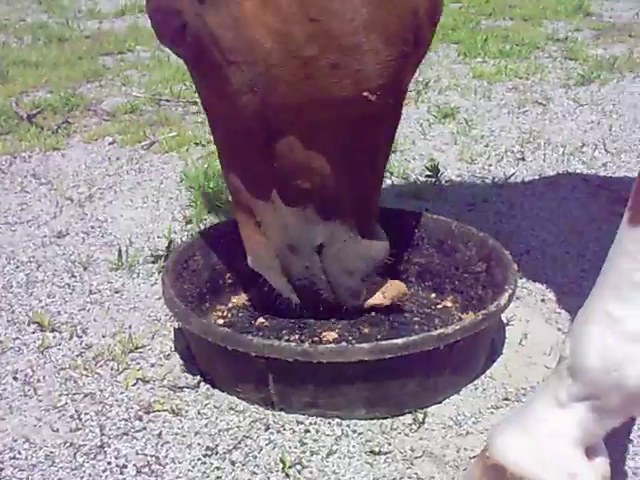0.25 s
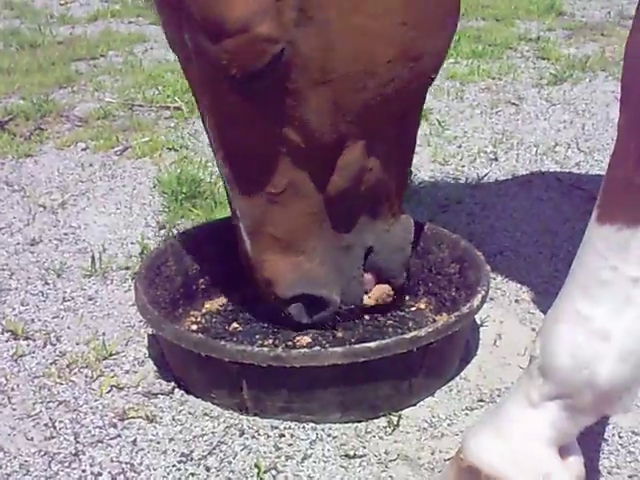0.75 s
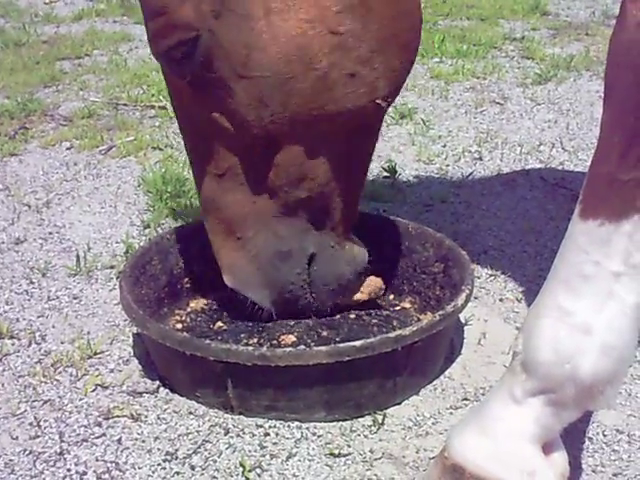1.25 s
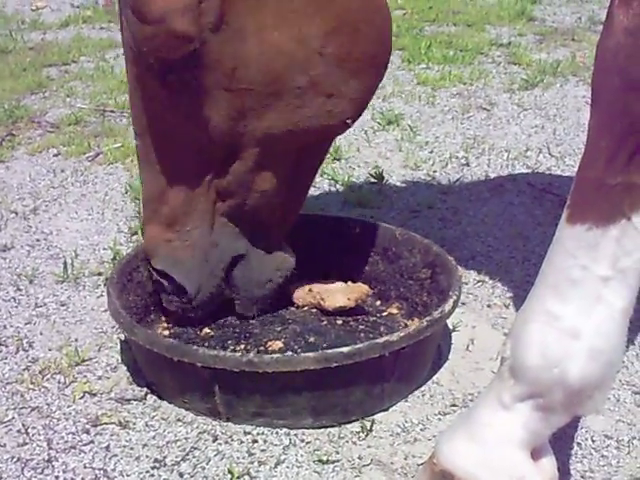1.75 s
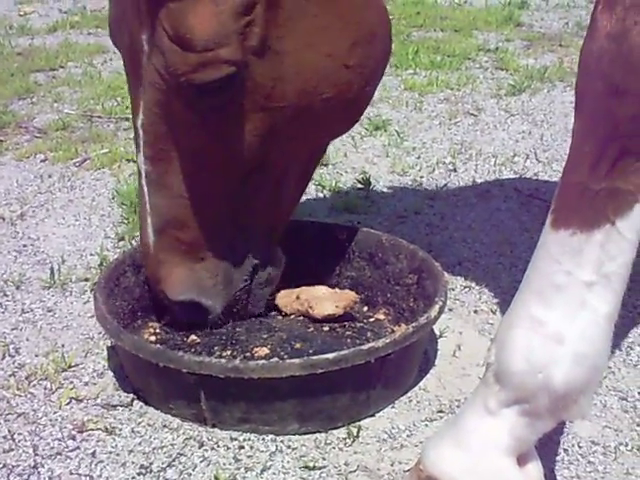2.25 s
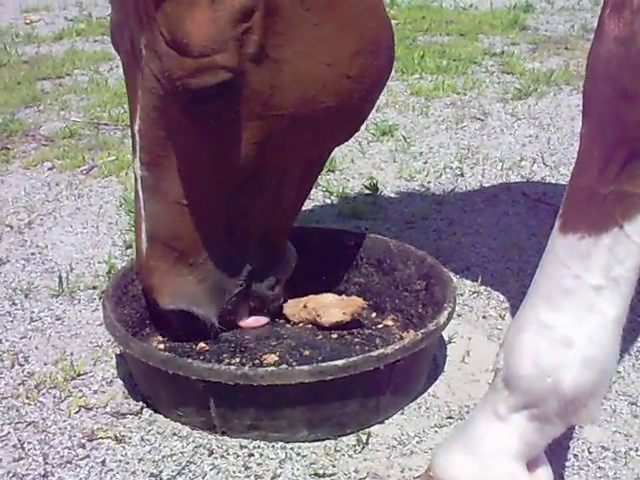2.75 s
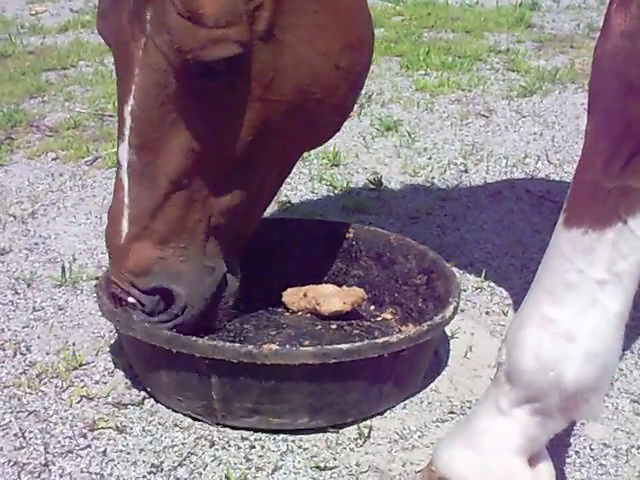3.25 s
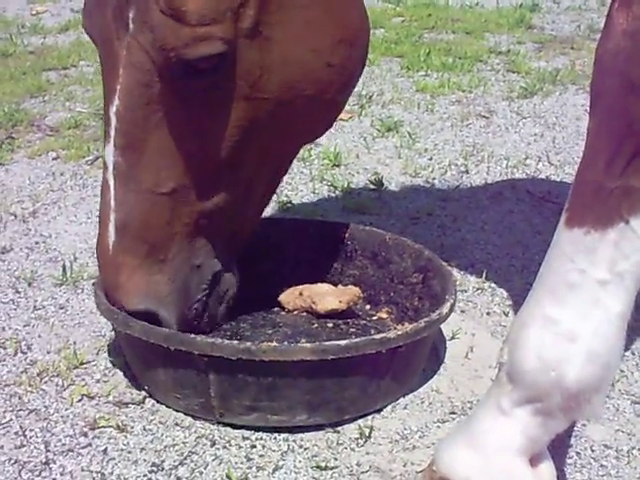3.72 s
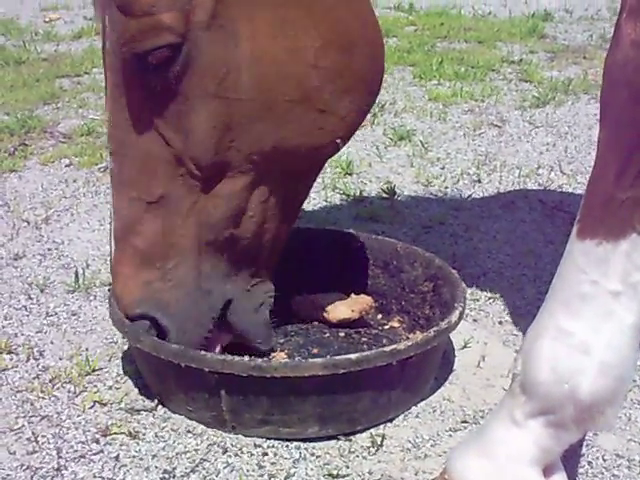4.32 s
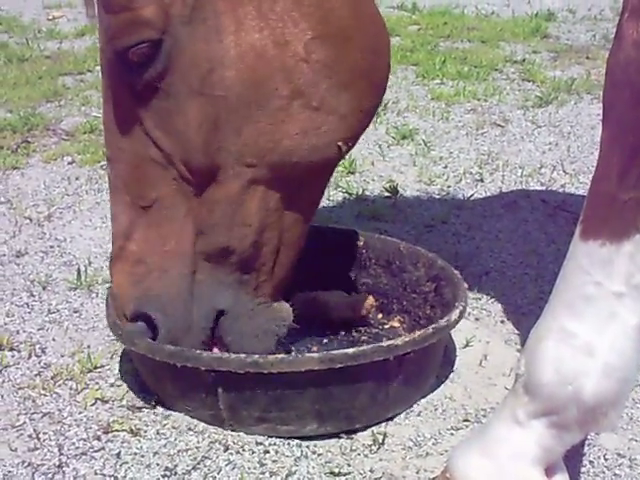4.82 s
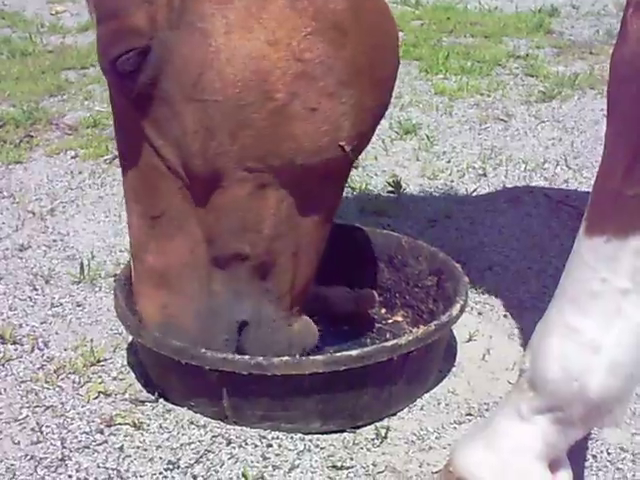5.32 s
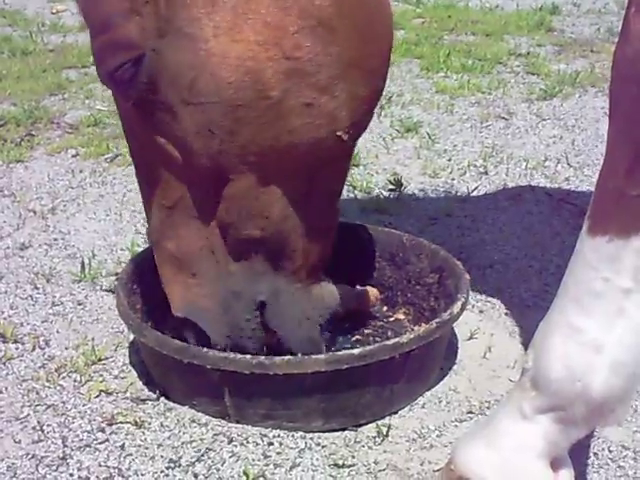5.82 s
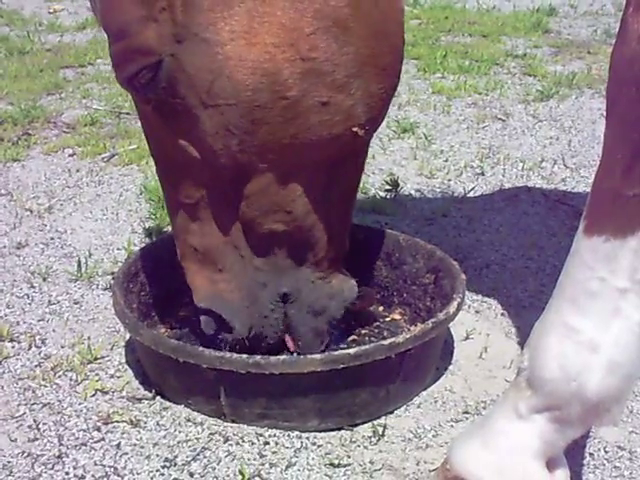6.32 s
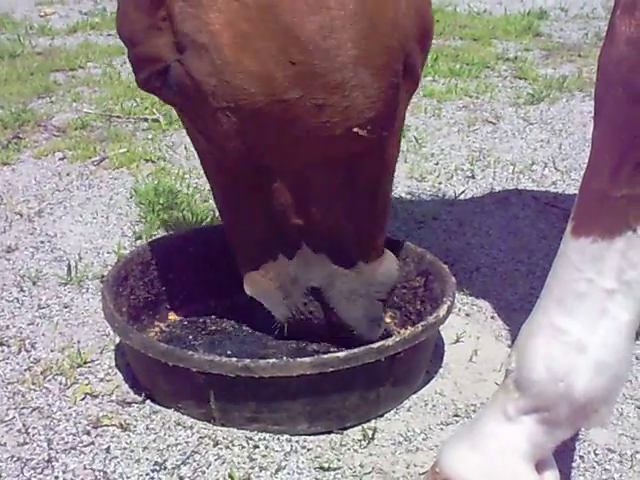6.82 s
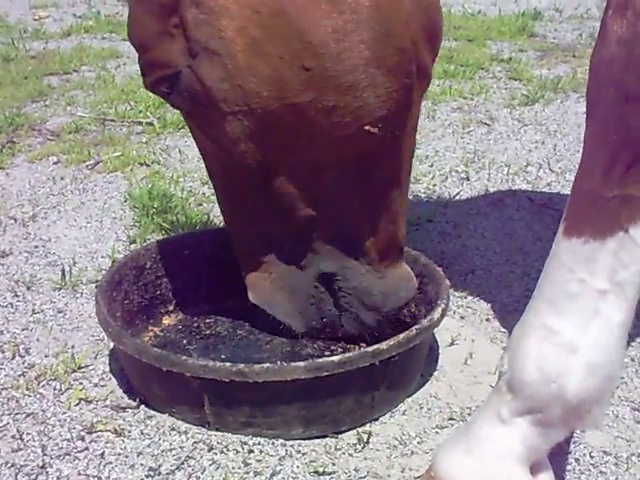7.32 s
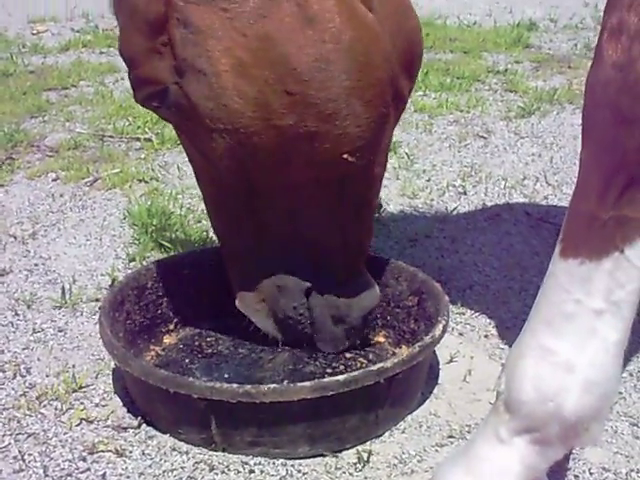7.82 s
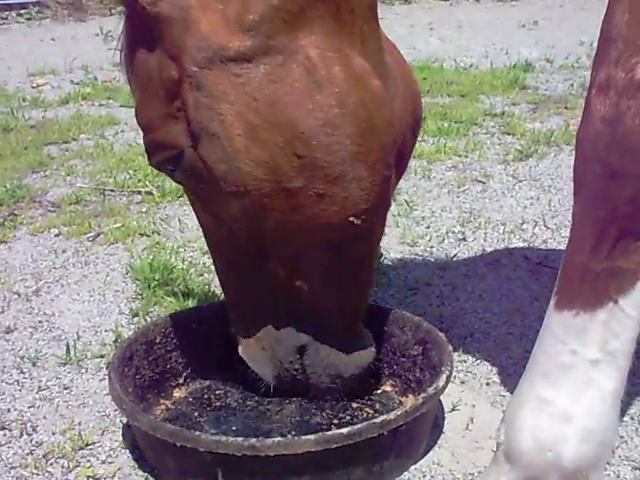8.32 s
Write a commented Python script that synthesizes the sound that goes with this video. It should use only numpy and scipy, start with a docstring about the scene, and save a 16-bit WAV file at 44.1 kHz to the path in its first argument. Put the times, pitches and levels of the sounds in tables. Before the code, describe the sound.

A horse licks and nibbles icy mash from a pan up close, with wet smacks, soft bumps and crumbly rustling over a quiet outdoor rush.

```python
"""First an even outdoor rush with a far motor hum and light wind rumble; then a muzzle bumps a feed pan.
Close to the microphone a horse licks and nibbles frozen mash out of the pan on gravel. Random slips ring
the pockets of the mouth as wet lips and tongue smack and lick; decaying sine modes make the bumps.
Dense grains of noise make the rustle of icy crumbs, and a wavering sine makes a faint, sagging whistle."""
import sys
import numpy as np
from scipy import signal
from scipy.fft import rfft, irfft
from scipy.io import wavfile

SR = 44100
rng = np.random.default_rng(int(sys.argv[2]) if len(sys.argv) > 2 else 0)


def master_out(mix):
    """Clip the mix to full scale and print it as 16-bit PCM to the path in sys.argv[1]."""
    frames = np.transpose(np.atleast_2d(mix))
    ceiling = np.clip(frames, -1, 1)
    pcm = np.round(ceiling * 32767).astype(np.int16)
    wavfile.write(sys.argv[1], SR, pcm)


N = 377315  # length in samples


def from_db(db):
    """Decibels to amplitude gain."""
    return 10 ** (np.asarray(db) / 20)


def rms_one(x):
    """Scale to unit power."""
    return x / np.sqrt(np.mean(x ** 2) + 1e-20)


def in_time(rows):
    """Interpolate each column of a curve over its times, sample by sample."""
    times, *columns = np.transpose(rows)
    return [np.interp(np.arange(N) / SR, times, column) for column in columns]


def drift(rate):
    """Random wandering with rms 1, drawn through rate random knots a second."""
    knots = rng.standard_normal(N // 40)
    return rms_one(np.interp(np.arange(N) / SR * rate, np.arange(len(knots)), knots))


def colour(x, spectrum):
    """Shape a steady sound by a spectrum, interpolated over log frequency; rms 1."""
    hz, db = np.transpose(spectrum)
    bins = np.maximum(np.arange(N // 2 + 1) * SR / N, 1)
    gain = from_db(np.interp(np.log(bins), np.log(hz), db))
    return rms_one(irfft(rfft(x) * gain, N))


def resonate(x, hz, width_hz):
    """A damped cavity, as a two-pole resonator with gain about 1 at its centre."""
    r = np.exp(-np.pi * width_hz / SR)
    numerator = [(1 - r * r) / 2, 0, (r * r - 1) / 2]
    denominator = [1, -2 * r * np.cos(2 * np.pi * hz / SR), r * r]
    return signal.lfilter(numerator, denominator, x + 1e-18)


def add(track, s, sound):
    """Lay a sound into the track at s seconds."""
    at = round(s * SR)
    track[at:at + len(sound)] += sound[:N - at]


def grains(per_s, spread_db, smooth):
    """Tiny ruptures of uneven size over a share of smooth friction; rms 1."""
    sizes = from_db(spread_db * np.minimum(rng.exponential(1, N), 4))
    clicks = (rng.random(N) < per_s / SR) * sizes * rng.choice([-1, 1], N)
    return rms_one(rms_one(clicks) + smooth * rng.standard_normal(N))


def pocket(peel_s, hz, width_hz, skirt_hz, rasp):
    """A wet film snaps, then tears on in slips paced by peel_s, ringing an air pocket; unit power over 10 ms."""
    t = np.arange(SR // 12) / SR
    slips = rng.standard_normal(len(t)) ** 3
    tear = slips * (t / peel_s) * np.exp(-(t / peel_s) ** 2)
    # the slower the peel, the more the tearing outweighs the first snap
    push = rasp * np.sqrt(peel_s * 1000) * tear / np.linalg.norm(tear)
    push[0] += 1
    ring = resonate(resonate(push, hz, width_hz), hz, skirt_hz)
    return ring / np.sqrt(np.sum(ring ** 2) / (SR / 100))


def swell(s, swell_s):
    """A rounded rise to 1 at s seconds, then a quicker release."""
    release_share, roundness = 0.64, 1.2  # release time as a share of the rise; exponent
    u = (np.arange(N) / SR - s) / swell_s
    near = np.abs(u) < 6
    out = np.zeros(N)
    out[near] = np.exp(-np.maximum(-u[near], u[near] / release_share) ** roundness)
    return out


def strokes(rows, rest_db):
    """Gain of a run of strokes (s, swell s, dB), summed in power over a light, steady contact."""
    power = sum((from_db(db) * swell(s, swell_s)) ** 2 for s, swell_s, db in rows)
    return np.sqrt(from_db(rest_db) ** 2 + power)


# Far motor and wind rumble over time: t/s, mean motor level/dB, rumble level/dB
BACKGROUND_LEVELS = [(0, -55.5, -51), (.3, -52, -53), (.6, -50, -53), (1.1, -51, -49.5), (1.7, -51.5, -58),
                     (2.0, -61, -54), (3, -69, -55.5), (4, -68, -61), (4.4, -60, -60), (5, -79, -56),
                     (6, -61, -68), (6.5, -55, -53.5), (7.1, -57.5, -57), (7.6, -57.5, -50.5),
                     (8.5, -61, -53.5)]
# Spectrum of the wind rumble: f/Hz, relative level/dB per Hz
RUMBLE_SPECTRUM = [(10, -5), (25, -1.5), (48, -1), (90, -8), (200, -18), (600, -44.5), (4000, -82)]
# Spectrum of the even outdoor rush: f/Hz, relative level/dB per Hz
AIR_SPECTRUM = [(15, -17.5), (30, -12.5), (60, -7.5), (120, -8), (220, -11), (340, -14.5), (480, -19),
                (750, -21.5), (1100, -21.5), (1700, -25), (2600, -26), (7400, -30.5), (9000, -37)]


def outdoors():
    """Shaped noise for the even rush and light wind rumble, a wavering sine for the far motor."""
    motor_hz, air_db = 83.9, -48.5
    motor_db, rumble_db = in_time(BACKGROUND_LEVELS)
    phase = 2 * np.pi * np.cumsum(motor_hz + 1.83 * drift(10)) / SR
    motor = np.sqrt(2) * from_db(motor_db + 1.3 * drift(11)) * np.sin(phase)
    rumble = from_db(rumble_db) * colour(rng.standard_normal(N), RUMBLE_SPECTRUM)
    air = from_db(air_db) * colour(rng.standard_normal(N), AIR_SPECTRUM)
    return motor + rumble + air


def whistle():
    """A thin, faint, unsteady sine fades in, holds and fades out while it sags in pitch."""
    start_s, end_s, attack_s, release_s = 0.79, 1.63, 0.29, 0.22
    level_db, start_hz, sag_hz_per_s = -60.5, 5500, 170
    t = np.arange(N) / SR
    hz = start_hz - sag_hz_per_s * (t - start_s)
    fade = np.clip(np.minimum((t - start_s) / attack_s, (end_s - t) / release_s), 0, 1)
    gain = fade * from_db(level_db + 2.8 * drift(40))
    return np.sqrt(2) * gain * np.sin(2 * np.pi * np.cumsum(hz + 18 * drift(120)) / SR)


def faint_smacks():
    """Small films of spit burst at random moments and pitches."""
    per_s, lip_db, spit_db = 4, -58.5, -54  # levels before the random size of 0.5 to 1.5
    out = np.zeros(N)
    for when, lip, spit, size in rng.random((int(per_s * N / SR), 4)):
        lip_ring = pocket(0.0026, 1400 + 1400 * lip, width_hz=200, skirt_hz=800, rasp=0.9)
        spit_ring = pocket(0.002, 3500 + 3500 * spit, width_hz=650, skirt_hz=2000, rasp=1.2)
        both = from_db(lip_db) * lip_ring + from_db(spit_db) * spit_ring
        add(out, when * (N - 1) / SR, (.5 + size) * both)
    return out


# The muzzle sweeps over icy crumbs: t/s at the fastest point, swell t/s, level/dB
SWEEPS = [(0.21, 0.05, -52), (0.34, 0.016, -54), (0.585, 0.028, -47), (0.9, 0.1, -53), (1.16, 0.12, -51),
          (1.39, 0.073, -50.5), (1.515, 0.015, -47), (1.64, 0.068, -49.5), (1.962, 0.057, -40),
          (2.305, 0.05, -40.5), (2.44, 0.035, -46.5), (2.58, 0.071, -40.5), (2.795, 0.03, -46),
          (3.04, 0.18, -50.5), (3.24, 0.087, -50), (3.44, 0.13, -51.5), (3.58, 0.045, -47),
          (3.9, 0.018, -48.5), (4.51, 0.05, -51), (4.955, 0.064, -46), (5.26, 0.051, -49.5),
          (5.49, 0.053, -47.5), (5.7, 0.04, -49), (6.03, 0.036, -51.5), (6.11, 0.02, -50),
          (6.218, 0.035, -41.5), (6.37, 0.035, -48), (6.495, 0.07, -40), (6.66, 0.078, -49),
          (6.985, 0.034, -49), (7.27, 0.038, -51.5), (7.57, 0.081, -48.5), (7.79, 0.047, -47),
          (7.935, 0.032, -49.5), (8.135, 0.083, -44.5), (8.46, 0.056, -52)]
# Spectrum of the rustling crumbs: f/Hz, relative level/dB per Hz
CRUMB_SPECTRUM = [(300, -24.5), (1000, -12), (2200, -6.5), (3400, -2.5), (5000, 3), (6200, 1.5), (7300, 4),
                  (9000, -3.5)]


def sweeping():
    """Whiskers and lips brush over the crumbs: a fine, dense rustle of tiny ruptures."""
    gain = strokes(SWEEPS, rest_db=-58) * from_db(2.0 * drift(110))
    return gain * colour(grains(per_s=5200, spread_db=2.5, smooth=.9), CRUMB_SPECTRUM)


def wet_friction(gain, resonances, per_s, spread_db, shift_db):
    """Sticky slips sound through cavities whose levels wander as the mouth changes shape."""
    slips = grains(per_s, spread_db, smooth=0.33)
    voiced = np.zeros(N)
    for k, (hz, width_hz, db) in enumerate(resonances):
        ring = rms_one(resonate(resonate(slips, hz, width_hz), hz, 3 * width_hz))
        voiced += (-1) ** k * from_db(db + shift_db * drift(14)) * ring  # alternate polarity
    return gain * rms_one(voiced)


# Licks: t/s at the firmest point, swell t/s, tongue in the hollow of the mouth level/dB,
# wet mash between the lips level/dB
LICKS = [(0.2, 0.021, -61, -58), (0.775, 0.044, -51.5, -53.5), (1.049, 0.031, -53, -48),
         (1.23, 0.073, -57, -55), (1.39, 0.026, -65, -55), (1.58, 0.093, -55, -53),
         (1.93, 0.031, -47.5, -50), (2.02, 0.089, -57.5, -51), (2.31, 0.032, -57, -54),
         (2.405, 0.011, -48.5, -52), (2.6, 0.08, -63, -53), (2.78, 0.032, -49.5, -50),
         (3.08, 0.067, -57, -55), (3.32, 0.053, -52, -49.5), (3.426, 0.045, -43, -45.5),
         (3.5, 0.04, -48.5, -53), (3.6, 0.031, -49, -56), (4.57, 0.013, -63, -53), (4.95, 0.12, -53, -53.5),
         (5.47, 0.026, -50, -51), (5.69, 0.037, -47, -55), (6.2, 0.025, -51, -53), (6.5, 0.17, -57.5, -64),
         (7.21, 0.018, -51, -53.5), (7.3, 0.029, -52.5, -64), (7.56, 0.057, -51, -47),
         (7.73, 0.049, -49, -64), (8.052, 0.033, -46, -46), (8.165, 0.031, -48, -46.5),
         (8.46, 0.06, -44, -50.5)]
# Resonances of the hollow of the mouth: f/Hz, width f/Hz, relative level/dB
MOUTH_RESONANCES = [(614, 220, 1.5), (840, 440, -3.5), (433, 280, 1.5)]
# Resonances between the lips: f/Hz, width f/Hz, relative level/dB
LIP_RESONANCES = [(1320, 670, -1.5), (2144, 530, -1.5), (2830, 1000, -4.5)]


def licking():
    """The tongue rubs in the mouth and mash squeezes between the lips; neither quite rests between strokes."""
    rubbing = strokes([(s, swell_s, db) for s, swell_s, db, _ in LICKS], rest_db=-61.5)
    squeezing = strokes([(s, swell_s, db) for s, swell_s, _, db in LICKS], rest_db=-64)
    tongue = wet_friction(rubbing, MOUTH_RESONANCES, per_s=700, spread_db=2.0, shift_db=1.5)
    mash = wet_friction(squeezing, LIP_RESONANCES, per_s=600, spread_db=2.5, shift_db=3.5)
    return tongue + mash


# The muzzle bumps the pan: t/s, lowest pitch f/Hz, level/dB before the mode level,
# softness as treble loss/dB per octave
BUMPS = [(0.2243, 219, -25, -1.5), (0.2332, 223, -27, 14), (1.961, 290, -30, 8), (3.412, 420, -33, 8),
         (4.513, 368, -28.5, 14), (6.2188, 250, -27, 18), (6.997, 222, -23.5, 8.5), (7.65, 300, -31.5, 12),
         (8.157, 318, -30, 13), (8.171, 292, -32, 16), (8.384, 190, -33, 14), (8.491, 240, -34, 12)]
# Modes of the pan with the frozen lump in it: multiple of the lowest pitch f, level/dB, 60 dB decay t/s
PAN_MODES = [(1, -0.5, 0.027), (1.7, 4, 0.013), (2.44, -4, 0.032), (5.4, -10, 0.047), (6.8, -13, 0.024)]


def bumps():
    """The soft muzzle presses the pan against the gravel: gentle onsets on quickly damped sine modes."""
    out, t = np.zeros(N), np.arange(SR // 10) / SR
    onset = 1 - np.exp(-t / 0.00049)
    for s, hz, db, softness in BUMPS:
        for multiple, mode_db, t60 in PAN_MODES:
            decay = np.exp(-np.log(1000) * t / t60)
            ring = np.sin(2 * np.pi * hz * multiple * t) * decay * onset
            add(out, s, from_db(db + mode_db - softness * np.log2(multiple)) * ring)
    return out


# Lip and tongue smacks: t/s, time scale of the peel t/s, mouth cavity f/Hz, its level/dB,
# lip pocket f/Hz, its level/dB, its width f/Hz, spit film f/Hz, its level/dB
SMACKS = [(0.454, 0.0019, 520, -63, 2070, -42, 100, 4520, -56),
          (0.556, 0.0056, 653, -70, 2000, -68, 280, 3580, -53),
          (0.688, 0.002, 580, -57, 1270, -49.5, 180, 5120, -72),
          (0.7617, 0.004, 657, -52, 1420, -34.5, 240, 5320, -70),
          (0.776, 0.014, 684, -51, 1520, -47.5, 400, 6700, -69),
          (1.031, 0.01, 605, -48, 1790, -42, 280, 5770, -47),
          (1.13, 0.014, 650, -69, 2000, -72, 280, 3550, -50.5),
          (1.198, 0.008, 667, -40.5, 1550, -54, 280, 5440, -63),
          (1.5405, 0.0056, 600, -52, 1900, -45, 130, 4290, -66),
          (1.9935, 0.0027, 1010, -66, 2050, -44, 130, 7160, -70),
          (2.082, 0.004, 660, -54, 1930, -48, 200, 5300, -57),
          (2.121, 0.004, 650, -63, 2110, -53, 170, 5000, -60),
          (2.2306, 0.0006, 650, -70, 2000, -70, 280, 6240, -49.5),
          (2.2963, 0.0021, 658, -44.5, 2800, -52, 280, 5490, -53),
          (2.4597, 0.002, 670, -65, 1770, -60, 280, 5330, -49),
          (2.805, 0.0015, 650, -67, 3000, -52.5, 400, 6250, -53),
          (3.008, 0.0077, 780, -69, 2940, -45.5, 220, 4700, -47),
          (3.052, 0.002, 740, -52, 1430, -37.5, 400, 4360, -26.5),
          (3.06, 0.003, 730, -54, 2090, -49, 280, 3820, -56),
          (3.118, 0.0082, 587, -41.5, 1510, -70, 280, 4400, -56),
          (3.316, 0.018, 650, -70, 2110, -44.5, 170, 4790, -69),
          (3.834, 0.0024, 689, -40.5, 3040, -60, 280, 3340, -43),
          (3.842, 0.003, 684, -40, 1270, -55, 280, 6600, -44.5),
          (4.0322, 0.0028, 990, -57, 1750, -40, 450, 5070, -43),
          (4.041, 0.0051, 850, -50, 2300, -40, 600, 6160, -46),
          (4.3185, 0.0019, 640, -47, 2030, -42, 550, 7150, -41),
          (4.5139, 0.0026, 775, -48, 2400, -40, 950, 3460, -54.5),
          (4.7418, 0.0026, 760, -57, 2750, -44, 600, 4700, -44.5),
          (4.8345, 0.00052, 860, -68, 1150, -70, 280, 5570, -40),
          (5.2431, 0.0023, 660, -48, 1630, -59, 280, 5040, -56),
          (5.67, 0.018, 664, -45, 2260, -55, 280, 7220, -64),
          (5.84, 0.002, 650, -70, 1810, -70, 280, 7200, -46.5),
          (5.8492, 0.004, 530, -63, 2260, -40.5, 280, 4770, -49),
          (5.865, 0.002, 550, -69, 2500, -50, 350, 4910, -58),
          (6.074, 0.002, 550, -68, 2000, -50.5, 400, 5540, -53),
          (6.2184, 0.0033, 630, -45, 2080, -50, 600, 5100, -47.5),
          (6.391, 0.002, 550, -56, 1850, -48, 280, 4970, -69),
          (6.6501, 0.002, 540, -47.5, 1280, -57, 280, 4280, -46.5),
          (6.6986, 0.0014, 560, -53, 1480, -44, 400, 4200, -30.5),
          (6.7806, 0.0016, 660, -56, 1280, -46.5, 150, 3360, -70),
          (6.835, 0.0053, 760, -70, 1670, -46, 500, 3690, -42),
          (6.8492, 0.0015, 870, -68, 1250, -47, 280, 4200, -38),
          (6.8549, 0.002, 510, -70, 2330, -42.5, 400, 5870, -33.5),
          (6.9972, 0.0015, 750, -54, 2200, -53, 700, 3560, -59),
          (7.6501, 0.003, 560, -45, 1820, -70, 280, 6460, -74),
          (7.9933, 0.002, 700, -66, 2030, -70, 280, 4100, -46),
          (8.0268, 0.0051, 720, -39, 1500, -49.5, 500, 4620, -68),
          (8.171, 0.003, 700, -57, 2130, -52, 600, 4070, -48.5),
          (8.383, 0.0019, 800, -38, 1270, -38.5, 600, 3350, -39.5),
          (8.4188, 0.006, 736, -43, 1320, -45, 600, 4300, -46.5),
          (8.4378, 0.0026, 740, -41.5, 1170, -48, 450, 4630, -48),
          (8.4648, 0.002, 700, -37.5, 3060, -47, 350, 6560, -46),
          (8.489, 0.0022, 545, -64, 2420, -51, 280, 5230, -52)]


def smacks():
    """Each smack rings the deep mouth cavity, a small pocket at the lips and two pitches of the spit film."""
    out = np.zeros(N)
    for s, peel_s, mouth_hz, mouth_db, lip_hz, lip_db, lip_width, spit_hz, spit_db in SMACKS:
        mouth = pocket(peel_s, mouth_hz, width_hz=65, skirt_hz=380, rasp=0.34)
        lip = pocket(peel_s, lip_hz, width_hz=lip_width, skirt_hz=2.2 * lip_width, rasp=0.99)
        spit = pocket(peel_s, spit_hz, width_hz=780, skirt_hz=1510, rasp=1.9)
        high_spit = pocket(peel_s, 1.55 * spit_hz, width_hz=2700, skirt_hz=4500, rasp=1.4)
        add(out, s, from_db(mouth_db) * mouth)
        add(out, s, from_db(lip_db) * lip)
        add(out, s, from_db(spit_db) * spit)
        add(out, s, from_db(spit_db - 8.0) * high_spit)
    return out


def pan_echo(x, wet_db, t60):
    """Sound bounces briefly between the pan's wall, its bottom and the head: a decaying noise tail."""
    t = np.arange(SR // 8) / SR
    tail = rng.standard_normal(len(t)) * np.exp(-np.log(1000) * t / t60) * (t > .0015)
    return x + from_db(wet_db) * signal.fftconvolve(x, tail / np.linalg.norm(tail))[:N]


def scene():
    """The mouth at work in the pan, close by, over the outdoor background."""
    background = outdoors() + whistle()
    contacts = pan_echo(faint_smacks() + bumps() + smacks(), wet_db=-11, t60=0.058)
    return (background + sweeping() + licking() + contacts)[None]


def record(dry):
    """A narrow-band recorder: the treble falls away above 7.4 kHz and is cut above 8.8 kHz."""
    hz = np.arange(N // 2 + 1) * SR / N
    treble_gain = from_db(np.interp(hz, [7400, 8000, 8600], [0, -13, -15]))
    dulled = irfft(rfft(dry) * treble_gain, N)
    # order 10, 0.3 dB ripple, 70 dB stopband
    return signal.sosfilt(signal.ellip(10, .3, 70, 8800, fs=SR, output="sos"), dulled)


dry = scene()
out = record(dry)
master_out(out)
```